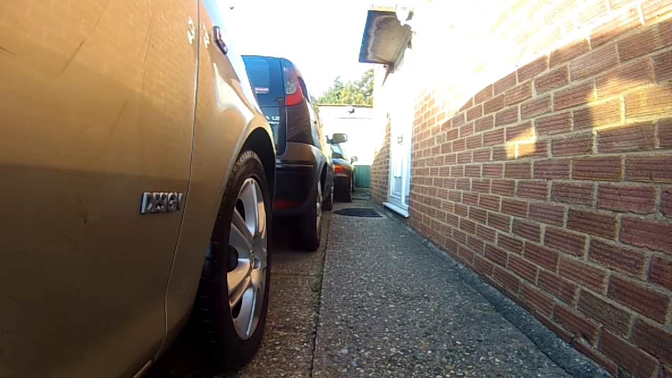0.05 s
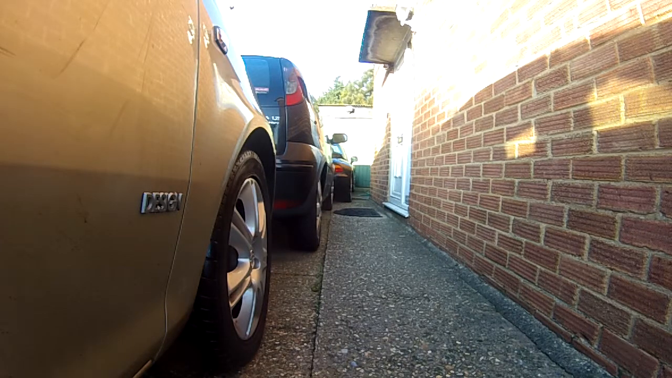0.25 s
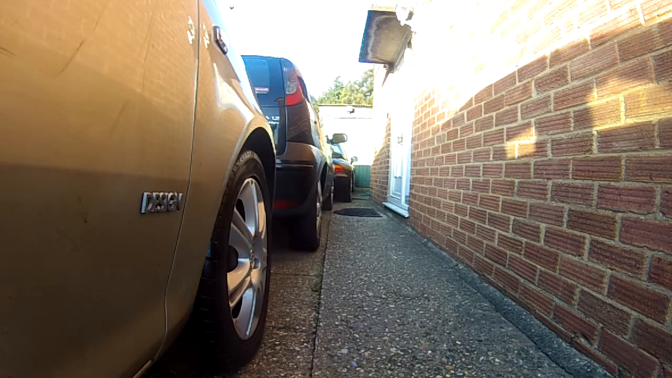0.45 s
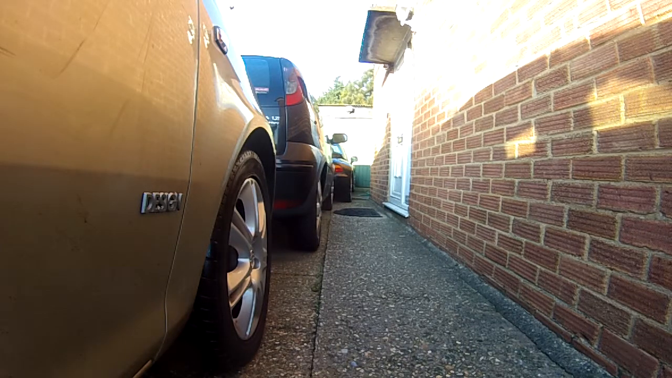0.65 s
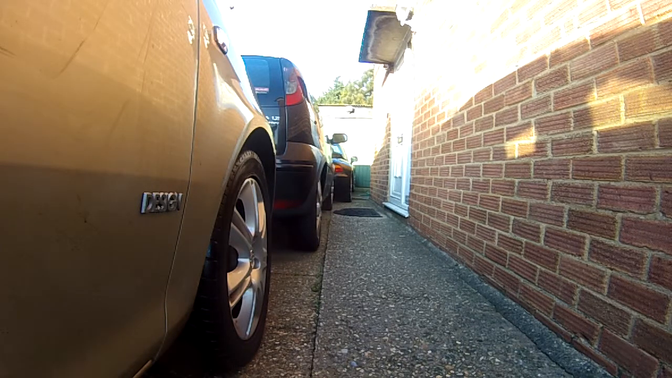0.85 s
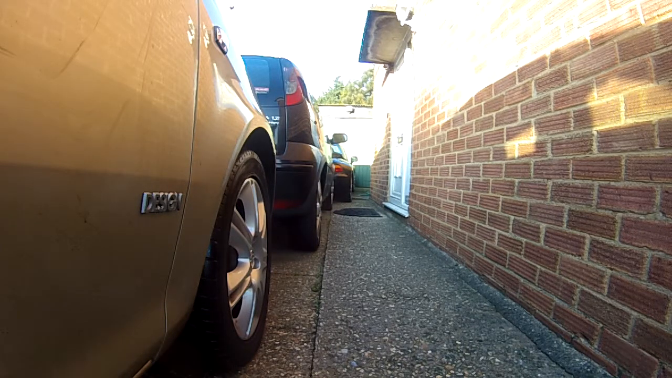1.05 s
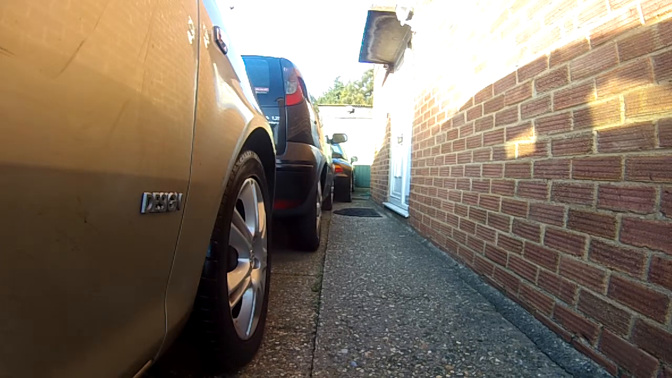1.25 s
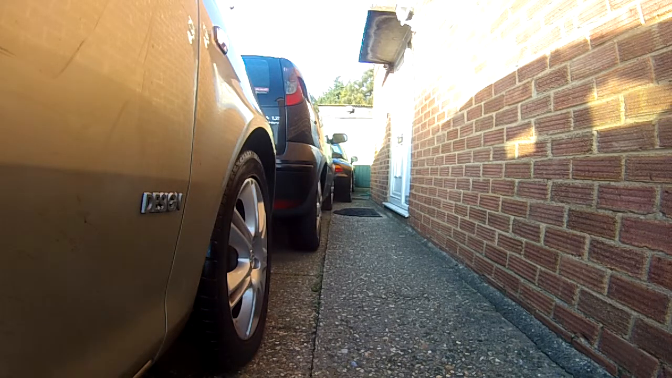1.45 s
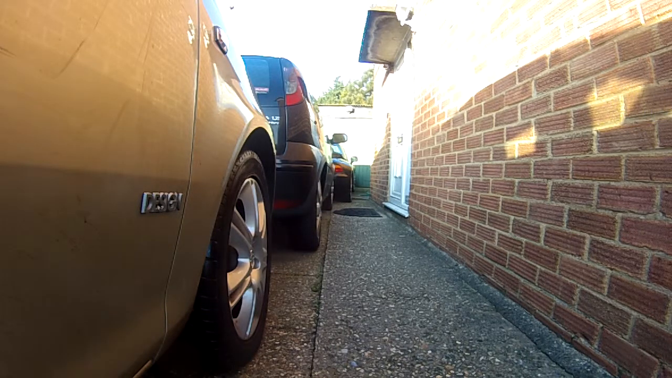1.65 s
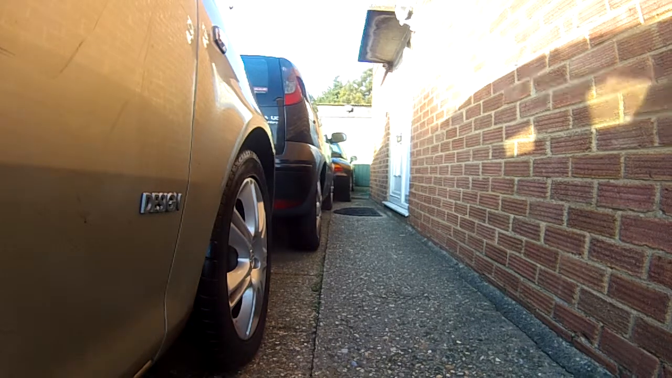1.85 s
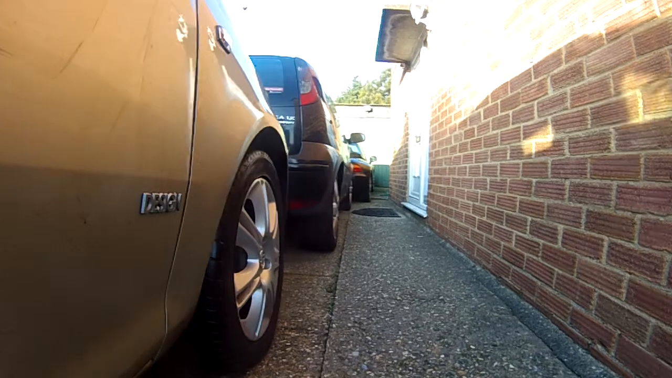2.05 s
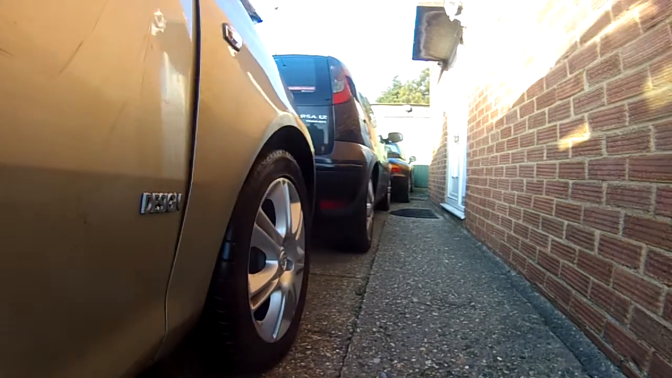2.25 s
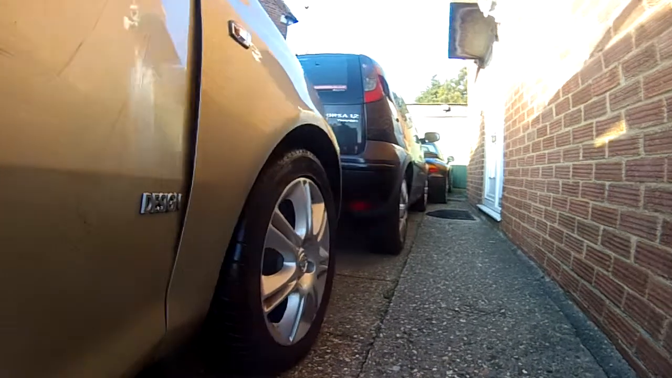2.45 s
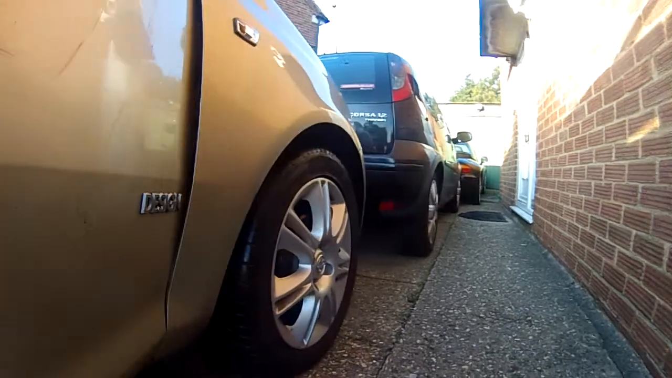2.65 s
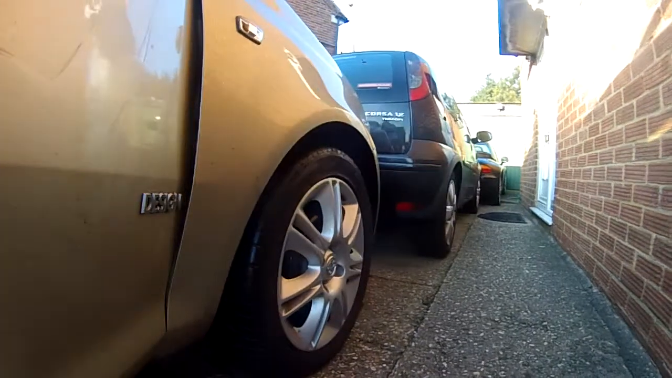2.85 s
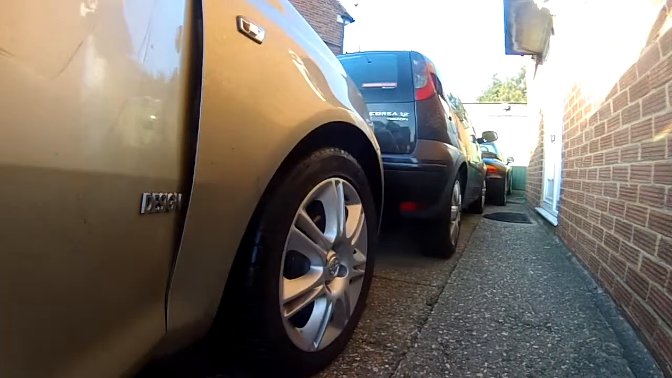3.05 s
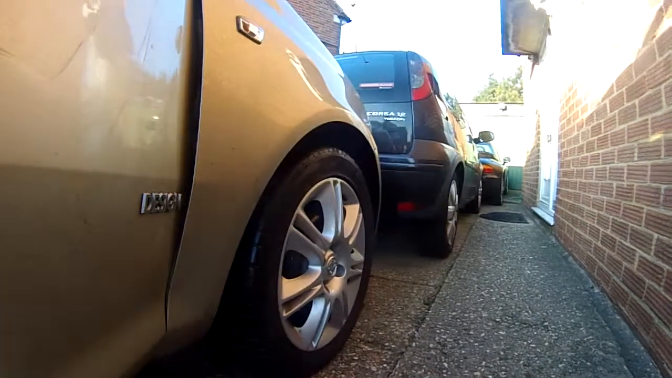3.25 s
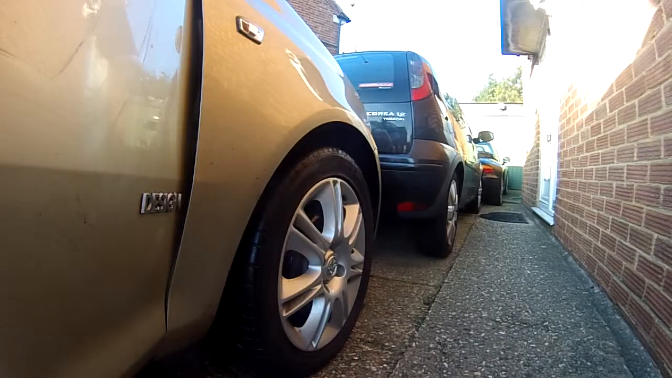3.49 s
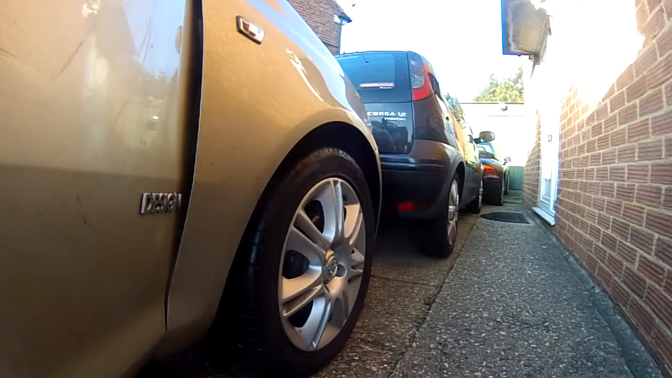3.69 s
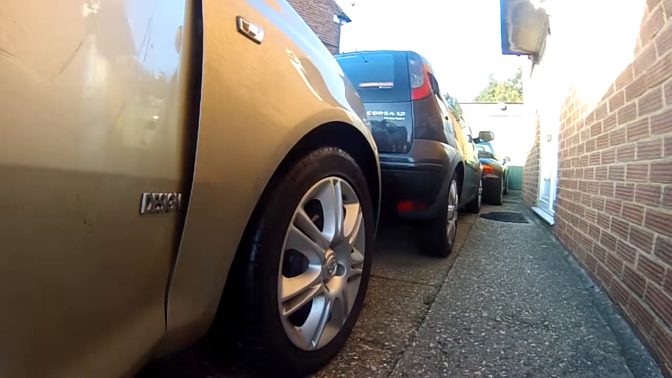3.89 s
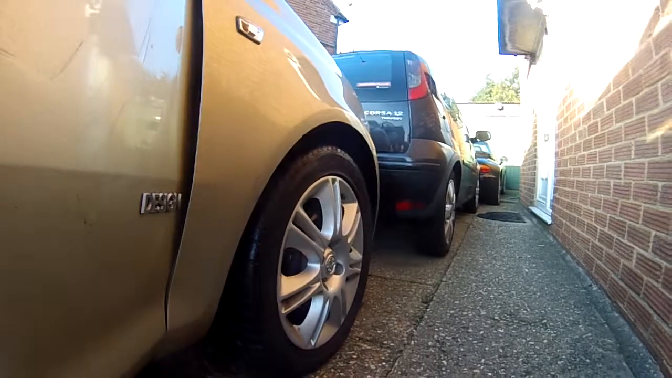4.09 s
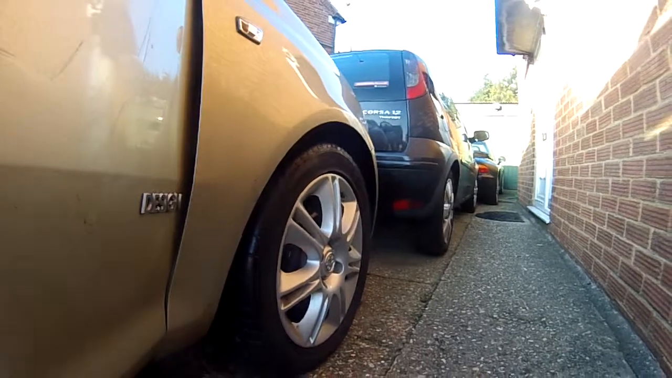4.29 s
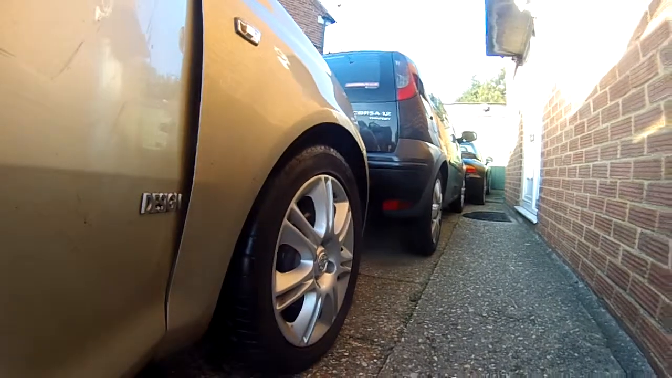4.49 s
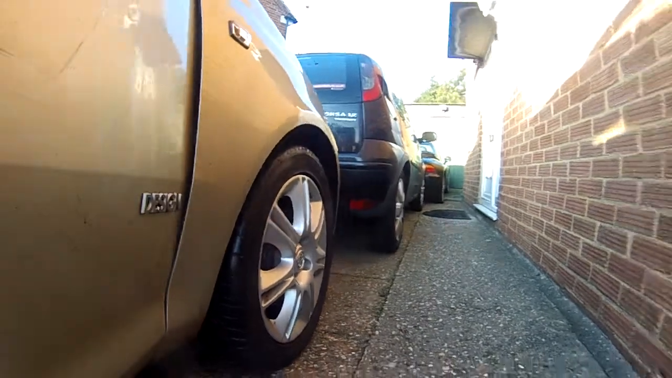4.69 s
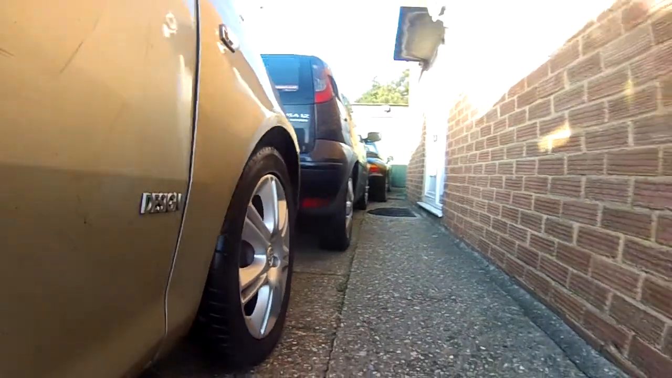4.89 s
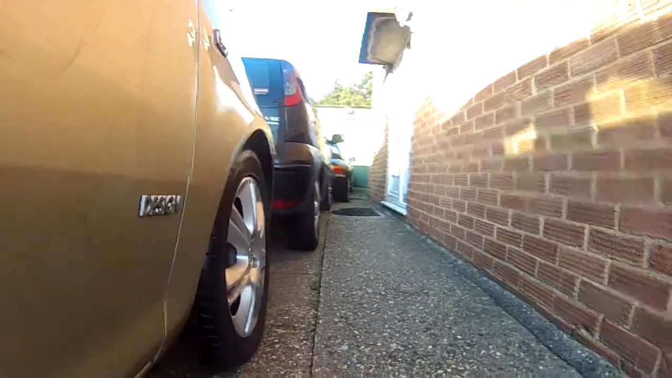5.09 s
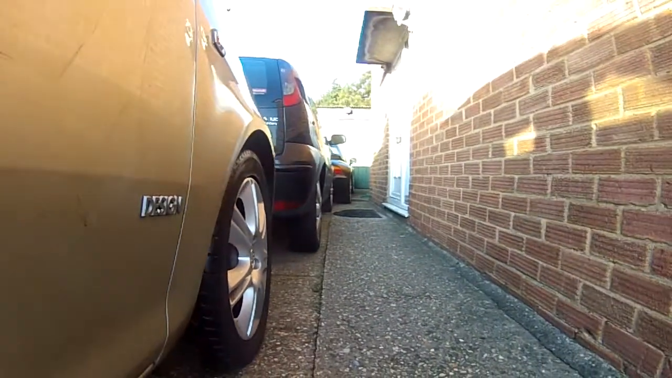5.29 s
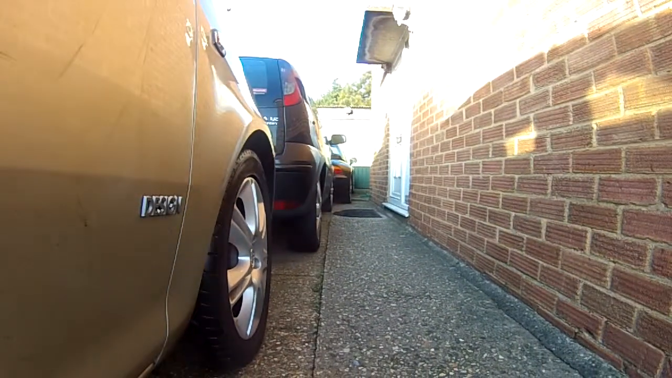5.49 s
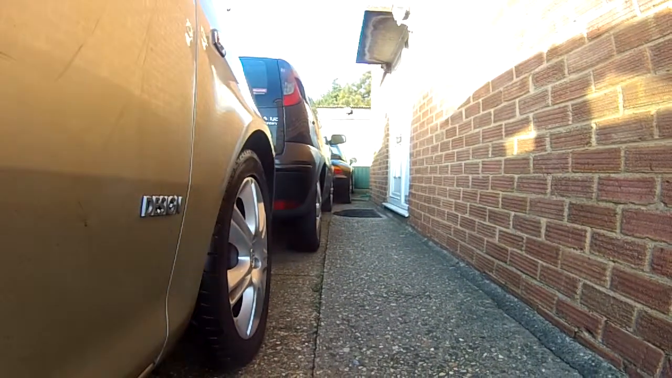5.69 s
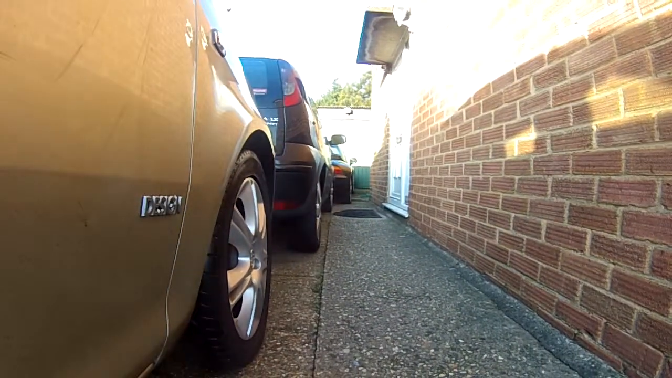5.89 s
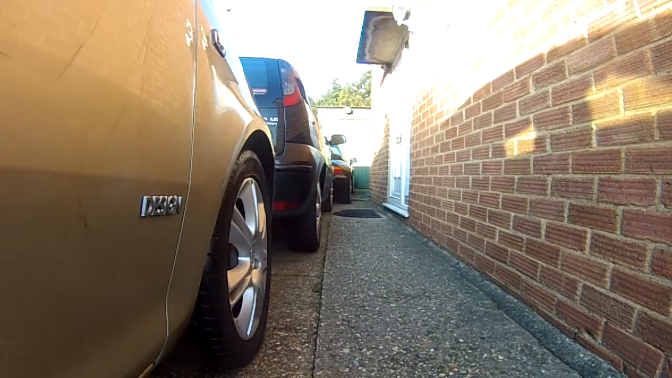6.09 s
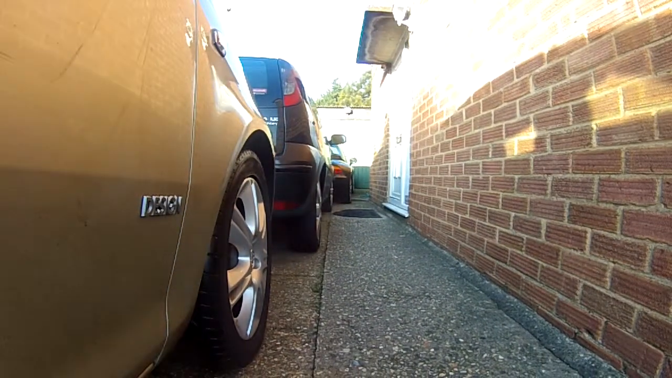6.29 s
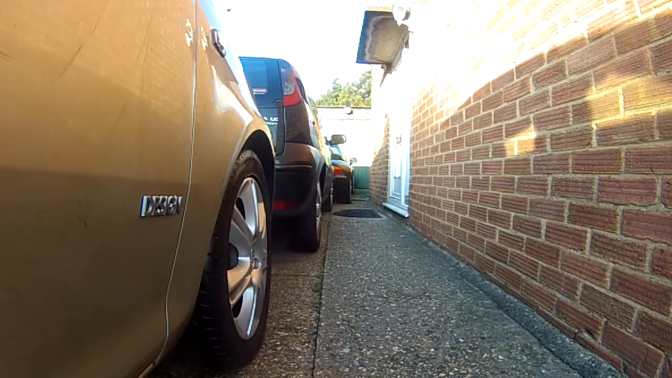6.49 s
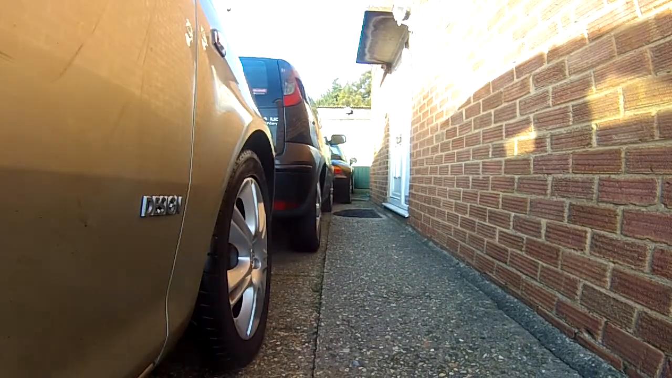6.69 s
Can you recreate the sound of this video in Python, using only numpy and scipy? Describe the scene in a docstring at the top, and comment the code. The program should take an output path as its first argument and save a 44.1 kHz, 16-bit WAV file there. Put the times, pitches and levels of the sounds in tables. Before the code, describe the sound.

Faint plastic creaks, then a car door unlatches with a metallic clunk, swings open, and later slams with a deep, rattling boom on a driveway.

```python
"""On a driveway beside a brick wall, a car door is unlatched, swings to its check stop and is later slammed.
One listens from a plastic mount on the door, so ringing steel panel and deep cabin modes are strong.
The seal lands, the latch snaps and loose parts rattle, as shaped noise bursts and decaying modes.
The mount creaks in stick-slip bursts, handle and hinge rub, and feet shift as bands of grainy noise.
Far traffic, breeze and draught are shaped noise; a brick-wall echo and a thin tail follow door and feet."""
import sys
import numpy as np
from scipy import signal
from scipy.fft import rfft, irfft
from scipy.io import wavfile
from scipy.ndimage import uniform_filter1d

SR = 44100
rng = np.random.default_rng(int(sys.argv[2]) if len(sys.argv) > 2 else 0)


def unload_wav(signal):
    """Save mono or channel-first audio to the path in sys.argv[1] as 16-bit WAV at rate SR, clipped to [-1, 1]."""
    wavfile.write(
        sys.argv[1],
        SR,
        np.round(np.clip(np.atleast_2d(signal).T, -1, 1) * 32767).astype(np.int16),
    )


N = 297291

# The door skin's clearest modes, which ring on after each blow and colour the rubs.
# Each row: frequency in Hz, relative level in dB, time to fall by 60 dB in seconds.
SKIN_MODES = [(91, -6, 0.29), (129.2, -10.5, 0.21), (188, -5, 0.29), (229, -3.5, 0.26), (287, -5, 0.069),
              (314.5, -5, 0.13), (410.2, -8.5, 0.24), (490, -7, 0.13), (545.4, -16, .2), (667.6, -11, 0.2),
              (766, -22, 0.2), (923.6, -14, 0.22), (1080, -14.5, 0.11), (1264, -17.5, 0.28),
              (1440, -17, 0.12), (1980, -17, 0.26), (2040, -18.5, 0.3), (2351, -20.5, 0.08),
              (2740, -25, .2), (3140, -22.5, 0.042)]
# Shoves that move the whole door and the cabin air.
# Each row: start in seconds, level in dB, contact time in seconds.
DOOR_SHOVES = [(1.923, -24.5, 0.0084), (2.355, -58, 0.0027), (5.105, -22.5, 0.0065), (5.123, -20.5, 0.0062),
               (5.146, -14.5, 0.011), (5.179, -16, 0.0087)]


def amp(db):
    """Decibels to gain."""
    return 10 ** (np.asarray(db) / 20)


def axes(size):
    """Time axis in seconds and frequency axis in Hz of a sound of this many samples."""
    return np.arange(size) / SR, np.fft.rfftfreq(size, 1 / SR)


def read(points, hz):
    """Reads a table of (Hz, value) on a log-frequency axis."""
    f, value = np.transpose(points)
    return np.interp(np.log(hz + 1), np.log(f + 1), value)


def add(mix, s, sound):
    """Mixes a sound in at time s, cutting it where the mix ends."""
    part = mix[max(round(s * SR), 0):][:len(sound)]
    part += sound[:len(part)]


def evened(x):
    """Scales to rms 1."""
    return x / np.sqrt(np.mean(x ** 2) + 1e-20)


def noise(gain):
    """Noise of rms 1 with the given spectrum and random phases."""
    phases = np.exp(2j * np.pi * rng.random(len(gain)))
    return evened(irfft(gain * phases))


def grain(depth_db, length, size):
    """A random gain of rms 1 that wanders over about size samples."""
    wander = evened(uniform_filter1d(rng.standard_normal(length), size))
    return evened(amp(depth_db * wander))


def hump(hz, centre_hz, octaves):
    """A bell-shaped band on the log-frequency axis."""
    return np.exp(-.5 * (np.log2((hz + 1) / centre_hz) / octaves) ** 2)


def decay(t, t60):
    """Exponential fade that falls by 60 dB in t60 seconds."""
    return np.exp(-np.log(1000) * t / t60)


def die_away(x, t60s):
    """Lets each octave of x decay at its own speed."""
    t, hz = axes(len(x))
    centres = np.geomspace(62.5, 16000, 9)
    spectrum = rfft(x)
    out = np.zeros(len(x))
    for centre, share in zip(centres, np.eye(len(centres))):
        # overlapping triangular bands that add up to the whole spectrum
        band = irfft(spectrum * read(np.c_[centres, share], hz))
        out += band * decay(t, read(t60s, centre))
    return out


def strike(modes, contact, size):
    """Modes rung by a smooth push: the longer the contact, the duller the ring."""
    t, _ = axes(size)
    ring = sum(amp(db) * decay(t, t60) * np.sin(2 * np.pi * hz * t) for hz, db, t60 in modes)
    push = np.sin(np.pi * np.minimum(t / contact, 1)) + 1e-12
    return signal.fftconvolve(ring, push / push.sum())[:size]


def blows():
    """The hard blows, the rebounds that follow the slam, and the muffled thud that comes with each shove."""
    # The latch lets go, the check stop catches, then seal, latch and frame meet in the slam.
    # Each row: start in seconds, panel thud in dB before its low-pass, thud corner in Hz,
    # metal clatter in dB before its fade, clatter fade in seconds, clatter treble tilt in dB above about 4 kHz.
    hard = [(1.9231, -30.5, 1500, -34, 0.017, -2.5), (1.9290, -38.5, 2500, -21.5, 0.0057, -16),
            (1.9336, -29.5, 1500, -32.5, 0.0068, -17), (1.9410, -29.5, 400, -63, .008, -12),
            (2.3530, -29, 1500, -35, 0.012, -5), (2.3580, -38.5, 1500, -41.5, .0056, 8.5),
            (2.3666, -33, 710, -47, 0.016, -3), (5.0886, -32.5, 2520, -38, 0.014, -8.5),
            (5.0988, -44, 1200, -32, .0094, -13.5), (5.1115, -35, 500, -26, 0.0094, -1),
            (5.1239, -33, 250, -10, .0013, 0.5), (5.1397, -27, 297, -24, .007, -1.5)]
    # Loose parts rebound inside the slammed door. Each row: start in seconds, clatter level in dB.
    rattles = [(5.137, -25), (5.157, -27.5), (5.167, -22), (5.177, -25), (5.185, -25), (5.1941, -30),
               (5.1979, -24), (5.2115, -35), (5.2576, -43.5)]
    fade_s, thud_db, corner_hz = 0.0021, -13.5, 2000  # thud relative to the rattle's clatter
    treble_db, dulling_db_per_s = 8, 151.5  # each rebound is duller than the last
    first_s = rattles[0][0]
    rebounds = [(s, db + thud_db, corner_hz, db, fade_s, treble_db - dulling_db_per_s * (s - first_s))
                for s, db in rattles]
    shove_thud_db, shove_corner_hz = -5, 129  # how much of a shove reaches the skin through the seal
    muffled = [(s, db + shove_thud_db, shove_corner_hz, -np.inf, contact, 0)  # no clatter
               for s, db, contact in DOOR_SHOVES]
    return hard + rebounds + muffled


def door_blows(thud_rise_s=0.00092, clatter_rise_s=0.0006, grain_db=1.0, skin_db=-5):
    """Each blow rings the door skin's clear and dense modes and shakes the loose metal behind it."""
    # Dense modes of the door skin. Each row: frequency in Hz, relative density in dB per Hz.
    panel_spectrum = [(50, -14.5), (90, -2.5), (130, -1), (175, 3), (280, 2), (420, -5.5), (700, -9.5),
                      (1100, -5), (1500, -15), (2100, -26.5), (3000, -53.5), (4500, -46.5), (15000, -64)]
    # How long they ring. Each row: frequency in Hz, time to fall by 60 dB in seconds.
    panel_t60 = [(100, 0.32), (280, 0.27), (600, 0.192), (1200, 0.1), (2500, 0.11), (8000, .07)]
    # Loose metal inside the door. Each row: frequency in Hz, relative density in dB per Hz.
    clatter_spectrum = [(300, -28), (900, 2), (1500, -4.5), (2000, 7), (2350, -3), (2750, 1.5),
                        (3300, -9.5), (4000, -13), (5000, -23.5), (6500, -12), (8500, -20), (12000, -25.5),
                        (15500, -25)]
    out, (t, hz) = np.zeros(N), axes(16384)
    treble = 1 / (1 + (4000 / (hz + 1)) ** 6)
    rings = np.array([amp(db + skin_db) * decay(t, t60) * np.sin(2 * np.pi * f * t)
                      for f, db, t60 in SKIN_MODES])
    for s, thud_db, corner_hz, clatter_db, fade, treble_db in blows():
        dense = die_away(noise(amp(read(panel_spectrum, hz))), panel_t60)
        dense *= 1 - np.exp(-t / thud_rise_s)
        # each blow lands elsewhere on the skin and starts each mode up or down
        clear = rng.choice([-1, 1], len(rings)) @ rings
        # a blow cushioned by the rubber seal reaches mainly the low modes
        cushion = np.exp(-2 * np.pi * corner_hz / SR)
        thud = signal.lfilter([1 - cushion], [1, -cushion], dense + clear)
        # the clatter is many tiny contacts, so its level wavers within about a millisecond
        clatter = noise(amp(read(clatter_spectrum, hz) + treble_db * treble))
        clatter *= grain(grain_db, len(t), size=40)
        burst = np.exp(-t / fade) * (1 - np.exp(-t / clatter_rise_s))
        clatter = evened(clatter * burst) * np.sqrt(np.mean(burst ** 2))
        add(out, s, amp(thud_db) * thud + amp(clatter_db) * clatter)
    return out


def cabin_boom():
    """The deep modes of door and cabin, pumped by each shove."""
    # Modes of the cabin and the door shell.
    # Each row: frequency in Hz, relative level in dB, time to fall by 60 dB in seconds.
    cabin_modes = [(27, -3, 0.21), (49.34, -11, 0.067), (60.06, 0, .47), (77, 3.5, 0.13),
                   (128.5, 3.5, 0.26), (235, -17.5, 0.56), (286, -1, .2)]
    out = np.zeros(N)
    for s, db, contact in DOOR_SHOVES:
        add(out, s, -amp(db) * strike(cabin_modes, contact, size=32768))
    # door seals leak, so no steady pressure is held
    leak = signal.butter(1, 6, "high", fs=SR)
    return signal.lfilter(*leak, out)


def latch(click_hz=2900):
    """The latch pawl springs out and snaps home: a hard click and a short steel ring."""
    # Each row: start in seconds, ring level in dB, contact time in seconds, click level in dB.
    snaps = [(1.9286, -19, 0.00036, -90), (5.1238, -13.5, 0.000079, 2.5)]
    # Modes of the latch. Each row: frequency in Hz, relative level in dB, time to fall by 60 dB in seconds.
    latch_modes = [(1438, -14.5, .018), (2290, -9, .024), (2550, 0.5, 0.014), (3836, -14.5, 0.013),
                   (4570, -13, .008), (6420, -4.5, 0.011), (2078, -44, 0.59), (2540, -47.5, 0.73)]
    out = np.zeros(N)
    lead = 64 / SR  # puts the middle of the click on the start of the ring
    u = np.pi * click_hz * (np.arange(128) / SR - lead)
    click = (1 - 2 * u ** 2) * np.exp(-u ** 2)
    for s, ring_db, contact, click_db in snaps:
        add(out, s, amp(ring_db) * strike(latch_modes, contact, size=32768))
        add(out, s - lead, amp(click_db) * click)
    return out


def rub(rise, fade, centre_hz, octaves, grain_db=4.5, ring_db=7, ring_width_hz=45):
    """A grainy rub that swells and fades in one band, coloured by the door skin."""
    t, hz = axes(32768)
    dull = 1 / np.sqrt(1 + (hz / 3400) ** 8)  # the door passes little above its metal's ring
    peaks = np.max([1 / (1 + ((hz - f) / ring_width_hz) ** 2) for f, _, _ in SKIN_MODES], axis=0)
    swell = np.minimum(t / rise, 1) * np.exp(-np.maximum(t - rise, 0) / fade)
    hiss = noise(dull * amp(ring_db * peaks) * hump(hz, centre_hz, octaves))
    return swell * hiss * grain(grain_db, len(t), size=90)


def scuffs(rise_share=0.27, longest_rise_s=0.0064):
    """Handle, hinge and seal rub; each swells for a share of its fade, up to a limit."""
    # Rubs and a small squeak.
    # Each row: start in seconds, level in dB, fade in seconds, centre in Hz, width in octaves.
    rubs = [(.095, -64.5, 0.014, 2180, .37), (1.832, -57, 0.019, 1300, 0.91),
            (1.862, -50, 0.024, 2180, 1.3), (1.882, -51.5, 0.016, 2270, .55),
            (2.238, -68.5, 0.23, 2550, 0.46), (2.479, -60, 0.022, 1580, 0.23),
            (3.158, -52, 0.011, 1900, 0.36), (3.181, -53.5, 0.019, 660, 0.71),
            (3.258, -59, 0.0071, 1910, .5), (4.332, -59.5, 0.022, 1600, 0.66),
            (5.0884, -32, 0.0051, 980, .25), (5.543, -59.5, 0.035, 1894, 0.63),
            (5.870, -50, .016, 1015, 0.15)]
    out = np.zeros(N)
    for s, db, fade, centre_hz, octaves in rubs:
        rise = min(rise_share * fade, longest_rise_s)
        add(out, s, amp(db) * rub(rise, fade, centre_hz, octaves))
    return out


def creak(fade, pitch_hz, overtone_db, slips_per_s=1800, dry_db=-7):
    """A dying burst of tiny stick-slips rings the plastic mount; its envelope starts at rms 1."""
    # Resonances of the mount. Each row: ratio to the pitch, width in Hz, relative level in dB.
    mount_modes = [(1, 163, 19.5), (1.24, 1270, 14), (1.73, 710, 13.5), (2.1, 400, 14.5), (2.33, 900, -23)]
    t, _ = axes(8192)
    fading = np.exp(-t / fade)
    slips = rng.standard_normal(len(t)) * (rng.random(len(t)) < slips_per_s / SR) * fading
    slips[0] = 1  # the first slip breaks the grip
    sound = amp(dry_db) * evened(slips)
    for k, (ratio, width, mode_db) in enumerate(mount_modes):
        mode = np.exp(-np.pi * width * t) * np.sin(2 * np.pi * ratio * pitch_hz * t)
        rung = evened(signal.fftconvolve(slips, mode)[:len(t)])
        sound += amp(mode_db + overtone_db * (k > 0)) * rung
    high_pass = signal.butter(8, 5900, "high", fs=SR, output="sos")
    return evened(signal.sosfilt(high_pass, sound)) * np.sqrt(np.mean(fading ** 2))


def mount_creaks(ticks_per_s=20, spread_db=4.0, scatter=0.032, tick_overtone_db=-4):
    """The plastic mount's clear creaks, and stretches of faint, irregular ticks before the slam."""
    # Clear creaks. Each row: start in seconds, level in dB, fade in seconds, overtone boost in dB.
    creaks = [(0.028, -44.5, 0.01, -11), (.0585, -46.5, 0.0023, -1), (.071, -52.5, 0.013, -9),
              (0.1115, -46, 0.0062, -11), (.182, -53.5, 0.02, -4), (0.199, -43, 0.0067, 10),
              (0.211, -43.5, 0.021, 9), (.249, -44, 0.009, -2.5), (0.332, -56.5, 0.018, -8),
              (.366, -51.5, 0.0098, -2), (0.402, -48.5, 0.013, 22), (0.4097, -48.5, 0.013, 30),
              (0.444, -53, .0075, 6), (0.686, -53, 0.0029, 9), (0.771, -57.5, 0.0049, -8),
              (0.867, -53, 0.0075, 6), (1.063, -57.5, 0.005, 4), (1.195, -58, 0.0054, -2),
              (1.446, -53.5, .0093, -4), (1.481, -51, 0.012, 11), (1.498, -47.5, 0.0064, 8),
              (1.752, -46.5, 0.0033, 6), (2.023, -53, 0.0085, 1), (2.0946, -54.5, 0.0043, -4),
              (2.4605, -48.5, 0.0079, 2), (2.5684, -51, 0.0069, 5), (2.655, -59, 0.009, 5),
              (2.821, -59, 0.027, -0.5), (4.0838, -57, 0.019, -7), (4.4072, -53.5, 0.0069, 5),
              (4.826, -53.5, 0.01, -1), (5.683, -63.5, 0.037, -4)]
    # Faint ticking, dry at first and more drawn out while the door hangs open.
    # Each row: from and to in seconds, base level in dB, fade in seconds.
    fidgets = [(0.248, 0.998, -66, 0.0075), (1.456, 2.7, -66.5, 0.0055), (2.778, 3.749, -67, 0.012),
               (4.103, 4.819, -67, .015)]
    creak_hz, sharp_hz, sharp_fade_s = 6443, 1760, 0.0036  # the shorter the slip, the higher it rings
    out = np.zeros(N)
    for s, db, fade, overtone_db in creaks:
        pitch_hz = creak_hz + sharp_hz * np.exp(-fade / sharp_fade_s)
        add(out, s, amp(db) * creak(fade, pitch_hz, overtone_db))
    for start, end, db, fade in fidgets:
        count = round(ticks_per_s * (end - start))
        for place, loud, pitch in rng.random(size=(count, 3)):
            tick = creak(fade, creak_hz * (1 + scatter * (2 * pitch - 1)), tick_overtone_db)
            tick_db = db + spread_db * (2 * loud - 0.5)
            add(out, start + place * (end - start), amp(tick_db) * tick)
    return out


def footsteps(heel_rise=0.43, grit_rise=0.13, roll_db=-8, roll_rise_s=0.056, roll_fade_s=.08):
    """The heel thumps, grit scrapes under it, and the sole rolls down after."""
    # Soft footfalls beside the car.
    # Each row: start in seconds, heel level in dB, grit level in dB, length in seconds.
    steps = [(3.441, -58, -58.5, .012), (3.799, -62, -61, 0.035), (4.279, -53.5, -65, .055),
             (5.677, -47.5, -56, .045), (5.968, -47, -57, .018)]
    heel_band, grit_band = (215, 0.55), (980, 1)  # centre in Hz, width in octaves
    out = np.zeros(N)
    for s, heel_db, grit_db, length in steps:
        # heel and grit rise for a share of the length
        add(out, s, amp(heel_db) * rub(heel_rise * length, length, *heel_band))
        add(out, s, amp(grit_db) * rub(grit_rise * length, length, *grit_band))
        add(out, s + length, amp(heel_db + roll_db) * rub(roll_rise_s, roll_fade_s, *heel_band))
    return out


def driveway(x, wall_delay_s=.0105, wall_db=-25, tail_db=-32):
    """An echo off the brick wall and a thin tail from between house and cars."""
    # Decay of the tail. Each row: frequency in Hz, time to fall by 60 dB in seconds.
    yard_t60 = [(100, 0.44), (800, 0.65), (2500, 0.38), (8000, 0.061)]
    t, hz = axes(32768)
    tail = die_away(noise(np.ones(len(hz))), yard_t60) * np.minimum(t / wall_delay_s, 1)
    response = amp(tail_db) * tail / np.linalg.norm(tail)
    add(response, wall_delay_s, amp([wall_db]))
    return x + signal.fftconvolve(x, response)[:N]


def outdoors(traffic_db=-57, breeze_db=-66, draught_hz=40, draught_octaves=.75, whine_hz=8000, whine_db=-92):
    """Far traffic and hiss, a light breeze with the draught of the moving door, and a faint steady whine."""
    # Far traffic and hiss. Each row: frequency in Hz, relative density in dB per Hz.
    traffic_spectrum = [(15, -19), (35, -5), (60, 1), (90, 0.5), (125, -5), (200, -13.5), (290, -12.5),
                        (400, -19), (700, -19.5), (1100, -22), (2000, -29), (3800, -39), (6500, -38),
                        (15500, -43)]
    # Puffs of air past the microphone when the door moves.
    # Each row: peak time in seconds, level in dB, time constant of swell and fade in seconds.
    gusts = [(1.95, -47, 0.1), (2.29, -49.5, 0.043), (3.88, -46.5, 0.08), (4.31, -46.5, 0.053),
             (5.15, -43, .12)]
    t, hz = axes(N + N % 2)  # an even length for the noise
    traffic = amp(traffic_db) * noise(amp(read(traffic_spectrum, hz)))
    air = amp(breeze_db) + sum(amp(db) * np.exp(-abs(t - s) / width) for s, db, width in gusts)
    draught = air * noise(hump(hz, draught_hz, draught_octaves))
    whine = amp(whine_db) * np.sin(2 * np.pi * whine_hz * t)
    return (traffic + draught + whine)[:N]


def scene():
    """The door and its surroundings, in mono; boom, creaks and background get no echo."""
    door = driveway(door_blows() + latch() + scuffs() + footsteps())
    return (door + cabin_boom() + mount_creaks() + outdoors())[None]


def record(dry):
    """Full-scale clipping, then a band limit at 15.6 kHz."""
    low_pass = signal.firwin(255, 15600, window=("kaiser", 8), fs=SR)
    return signal.oaconvolve(np.clip(dry, -1, 1), low_pass[None], "same")


dry = scene()
out = record(dry)
unload_wav(out)
```